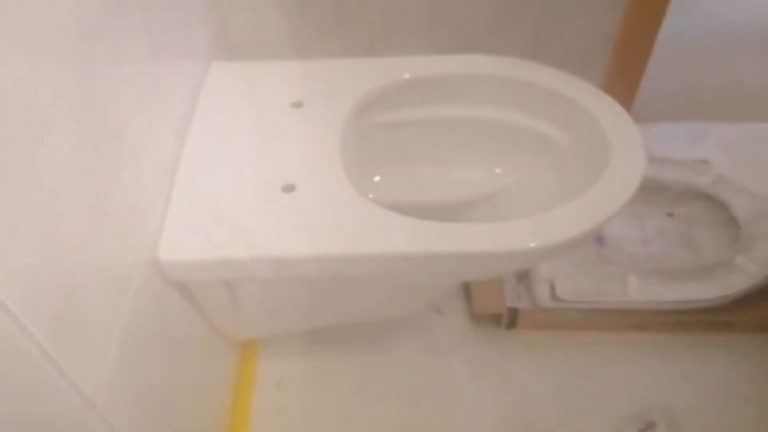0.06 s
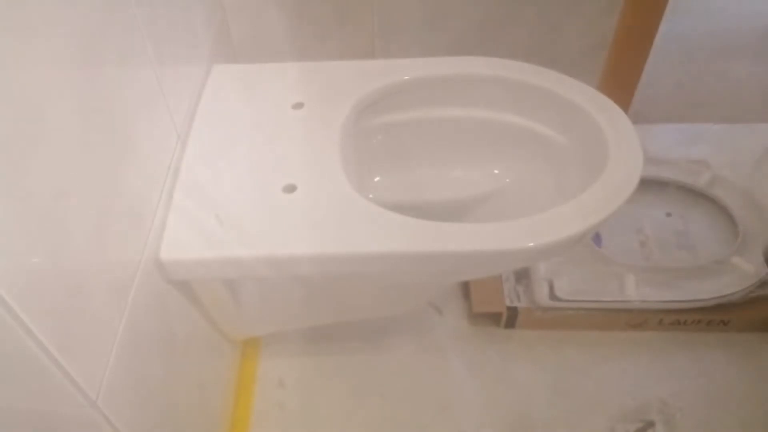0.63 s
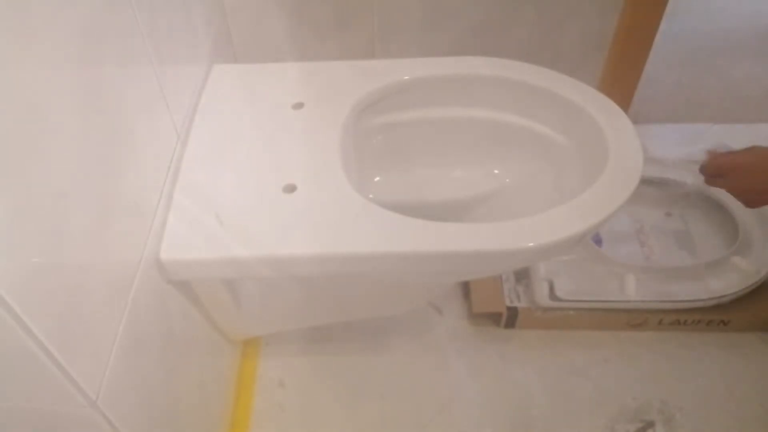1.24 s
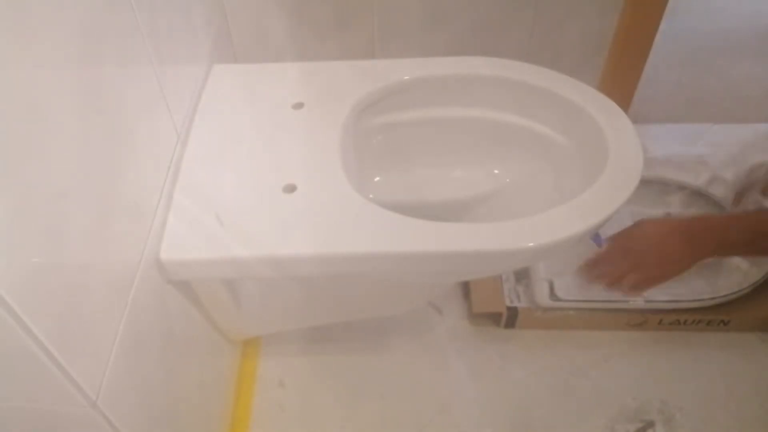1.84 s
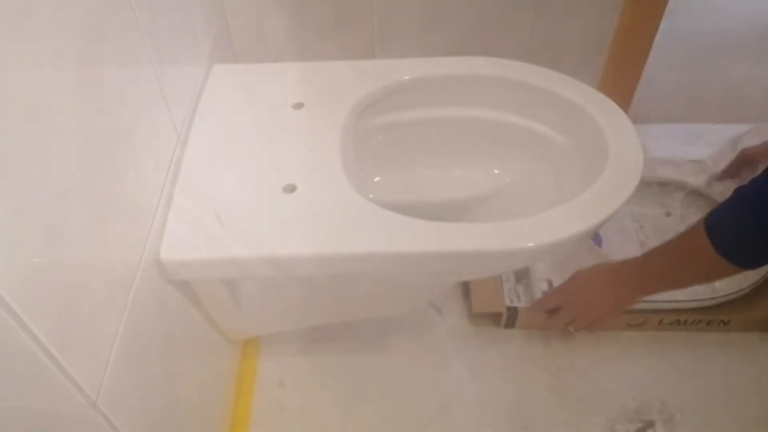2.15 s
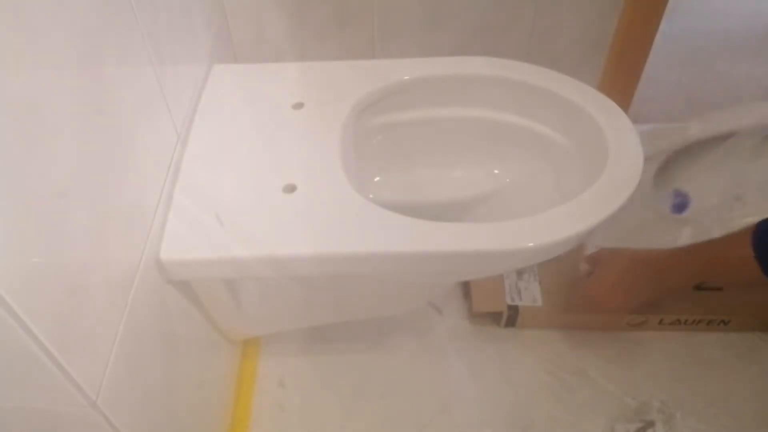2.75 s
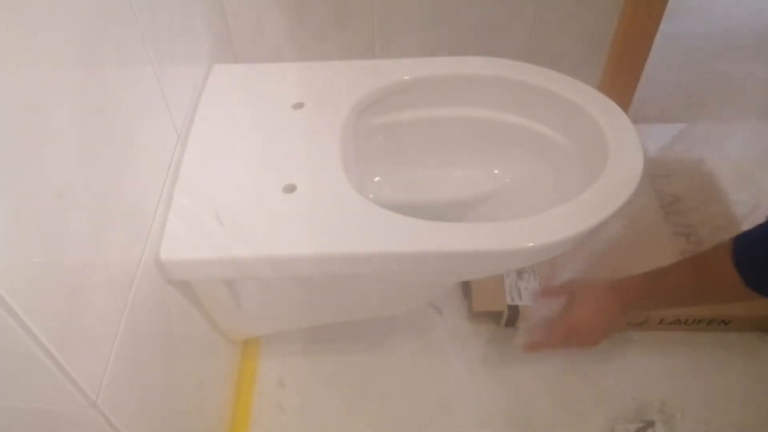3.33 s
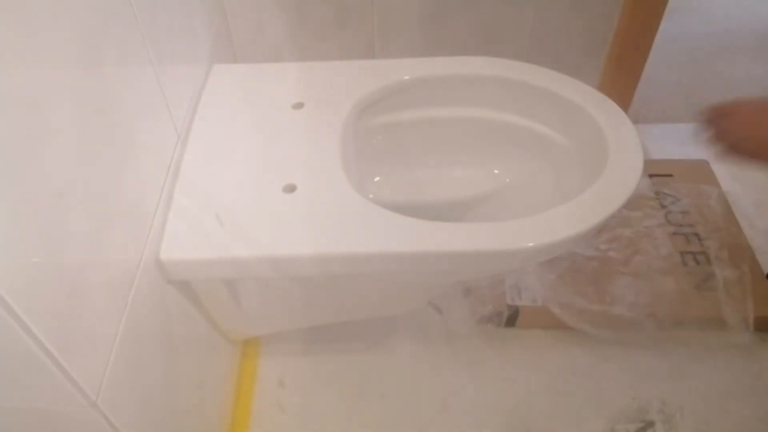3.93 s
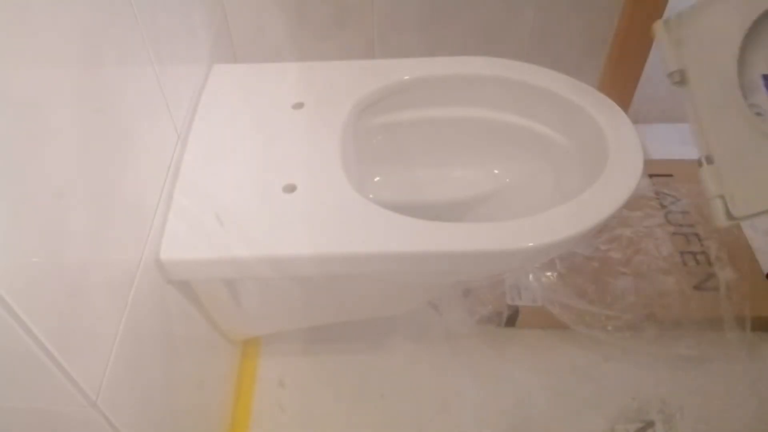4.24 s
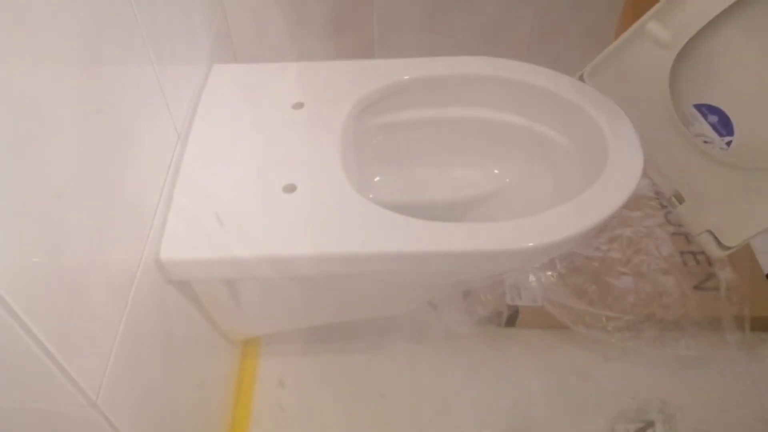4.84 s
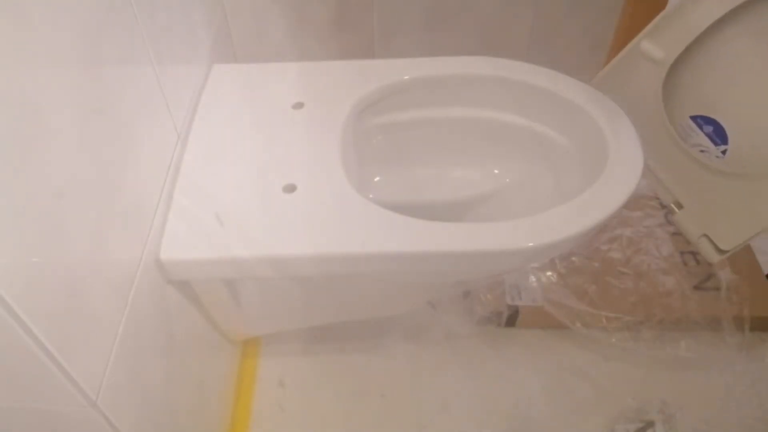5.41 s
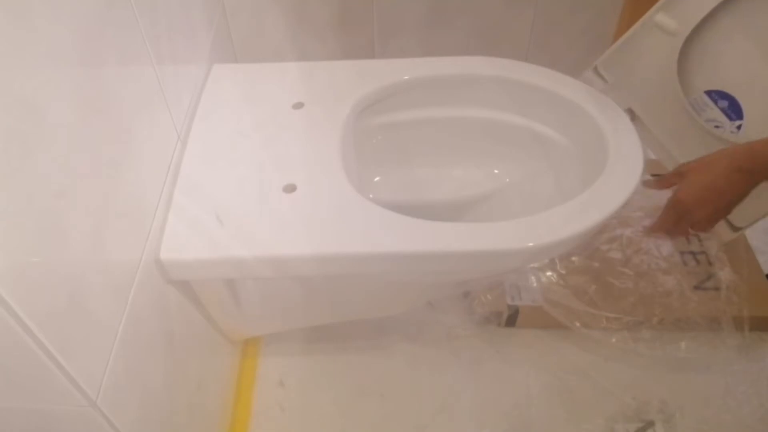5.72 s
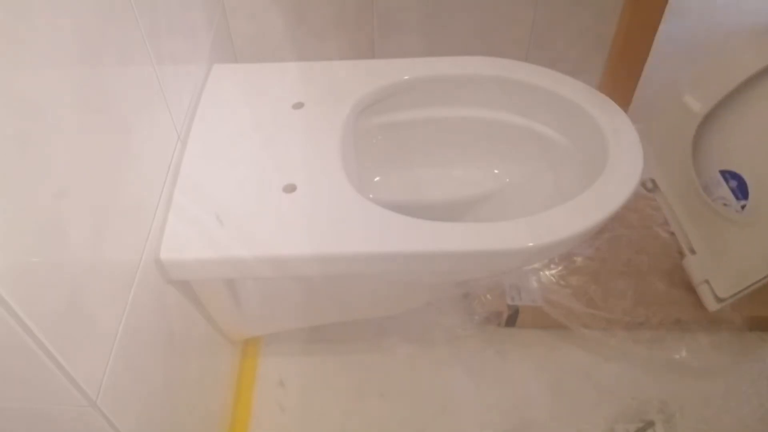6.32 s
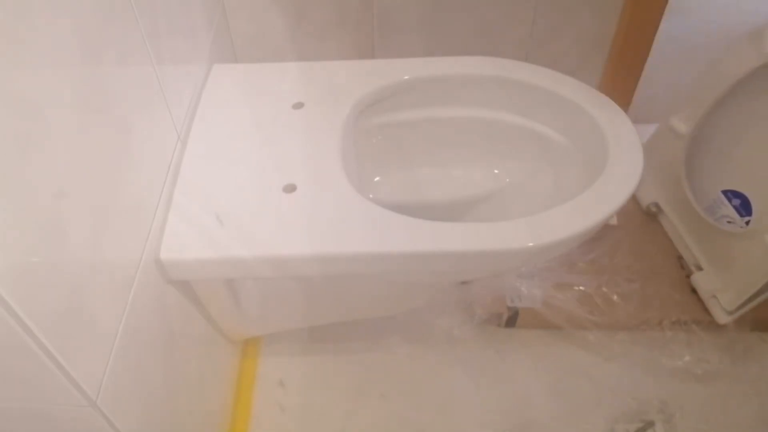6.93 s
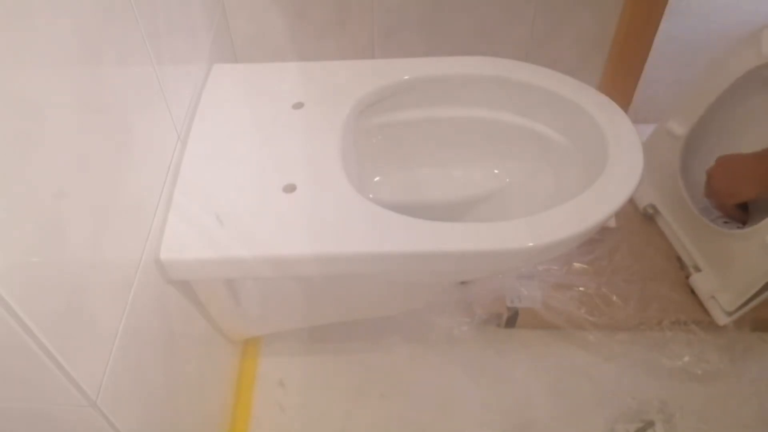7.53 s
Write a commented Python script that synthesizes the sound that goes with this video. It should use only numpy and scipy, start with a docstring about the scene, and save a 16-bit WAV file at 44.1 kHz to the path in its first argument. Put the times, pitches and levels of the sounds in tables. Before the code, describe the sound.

A toilet seat is pulled from a crinkling plastic bag, with dull cardboard thuds, hard knocks and a juddering scrape in an echoing room.

```python
"""In a small tiled bathroom, a toilet seat is drawn out of its plastic bag on a flat cardboard box.
The film slides and buckles in swells while friction shakes the box panels into a rumble. The seat
bumps the bowl and rings, is set down, judders over the floor by stick-slip and clacks once at a hinge.
Soft blows thud on the box, heavy pushes excite the room's low modes, and the tiles reverberate."""
import sys
import numpy as np
from scipy import signal
from scipy.fft import rfft, irfft, next_fast_len
from scipy.io import wavfile

SR = 44100
rng = np.random.default_rng(int(sys.argv[2]) if len(sys.argv) > 2 else 0)


def transcribe(u):
    """Save the signal u as a 16-bit wav file named by the first command-line argument.

    u: samples, shape (n,) or (channels, n), limited to [-1, 1]; the rate is SR.
    q: integer samples, one column per channel.
    """
    v = np.clip(np.atleast_2d(u).T, -1, 1)
    q = np.round(v * 32767).astype(np.int16)
    wavfile.write(sys.argv[1], SR, q)


N = 333837
TIME = np.arange(N) / SR
SPOTS = 4   # places that the handled things sound from
FFT_SIZE = next_fast_len(N + 2 * SR)


def film(rooms, slide_gain, crinkle_gain):
    """Friction and buckling: the film slides with a fine grain while its creases snap through."""
    # Each row: frequency in Hz, relative spectral level in dB.
    slide_spectrum = [(380, -20.5), (650, -4.5), (1200, 0), (1400, -2.5), (2000, -3), (2800, -7.5),
                      (3900, -17.5), (6000, -75)]
    crinkle_spectrum = [(1590, -8), (2700, -2.5), (4120, -3.5), (5100, -3), (6340, -5), (7610, -3.5),
                        (8370, -8.5), (9340, -4.5), (14500, -21), (15500, -23)]
    # Single creases snap. Each row: start in seconds, relative level in dB.
    creases = [(1.968, -15), (4.016, -28.5), (4.11, -36), (4.405, -25.5), (4.523, -24), (5.708, -32),
               (5.8645, -19.5), (5.877, -15.5), (7.099, -36), (7.263, -33.5)]
    sliding = from_db(0.5) * slide_gain * grains(per_s=4000, spread_db=0, clump_db=2.2, clump_rate=70)
    buckling = from_db(2) * crinkle_gain * grains(per_s=1700, spread_db=3, clump_db=0.64, clump_rate=98)
    buckling += contacts(creases, chatter=3.4, chatter_s=0.0063)
    return (in_room(scatter(sliding), colour(slide_spectrum), rooms, direct_db=-7.5, pan_db=2.5)
            + in_room(scatter(buckling), colour(crinkle_spectrum), rooms, direct_db=-8.5, pan_db=2.5))


def pulling():
    """Incoherent addition: pulls on the bag sum in power to gains of crinkling, sliding and rubbing."""
    # Each row: start, rise and length in seconds, relative crinkling level in dB,
    # then offsets from it in dB for sliding and for rubbing on the box.
    pulls = [(0.0, 0.0017, 0.014, -57.5, -0.5, 3.5), (0.062, 0.072, 0.31, -48, -6, -4),
             (0.212, 0.028, 0.077, -41, -5, -2), (0.317, 0.051, 0.088, -34, 0, -1),
             (0.403, 0.023, .11, -39.5, -1, 1.5), (0.669, 0.09, 0.18, -49.5, -0.5, -3.5),
             (0.796, 0.058, 0.16, -39.5, 3.5, 3), (1.012, 0.026, 0.15, -42, -0.5, -1.5),
             (1.167, 0.061, 0.068, -34, -1, 0), (1.403, 0.074, 0.26, -54.5, 0, 0),
             (1.508, 0.051, 0.13, -42.5, -1, -1.5), (1.71, .04, 0.26, -51.5, -3, -3),
             (1.943, .03, 0.077, -51, 1.5, 5), (2.05, 0.022, 0.2, -57.5, 2, 5),
             (2.236, 0.032, .1, -51.5, 1, 10), (2.297, 0.074, 0.24, -42.5, -3.5, -2.5),
             (2.544, 0.082, 0.076, -45, 2.5, 1), (2.703, 0.044, 0.27, -53.5, -1.5, -6),
             (2.84, 0.081, 0.25, -38.5, 0, 2), (3.039, 0.064, 0.14, -37.5, -.5, -.5),
             (3.222, 0.019, 0.078, -48, -16.5, -6.5), (3.409, 0.1, 0.24, -40.5, -2.5, -5),
             (3.65, .04, 0.13, -53, -1.5, -1), (3.85, 0.043, 0.14, -63.5, -2, -3),
             (4.197, 0.054, 0.62, -62, 2.5, -14), (4.484, 0.07, 0.38, -56.5, 1.5, -3),
             (4.88, 0.11, 0.15, -59.5, 10, 2), (5.692, 0.016, .04, -77, -5, -6),
             (5.838, 0.023, 0.078, -57, 0.5, -4), (5.94, .02, 0.041, -67, 6, 4),
             (6.128, 0.026, .05, -62.5, 5, 8), (6.321, 0.16, 0.23, -48, 1, -3),
             (6.658, 0.03, 0.075, -62, -3, -2), (6.805, 0.039, 0.1, -62, 2.5, 7),
             (7.258, 0.095, .11, -63, -7, -6), (7.371, 0.011, 0.013, -54.5, 6, -7)]
    power = np.zeros((3, N))
    for start, rise_s, length_s, db, slide_db, rub_db in pulls:
        levels = from_db([[db], [db + slide_db], [db + rub_db]])
        power += (levels * swell(start, rise_s, length_s, release_db_per_s=158)) ** 2
    return np.sqrt(power)


def box(rooms, rub_gain):
    """Forced vibration: friction shakes the cardboard panels and rubs on their faces."""
    # The load leans on the box. Each row: start and length in seconds, relative level in dB.
    shoves = [(0.242, .06, -38), (0.354, 0.14, -38.5), (0.804, 0.091, -38.5), (1.0, 0.089, -51.5),
              (1.16, 0.13, -43.5), (1.39, 0.055, -64), (1.52, 0.093, -48), (1.76, 0.048, -53),
              (1.94, 0.11, -44.5), (2.02, 0.12, -39.5), (2.195, 0.1, -42), (2.522, 0.12, -41),
              (2.86, .13, -44.5), (3.084, 0.15, -46), (3.333, 0.027, -50.5), (3.45, .05, -51),
              (3.616, 0.16, -54.5), (3.84, 0.074, -65), (5.17, .06, -53.5), (5.345, 0.072, -53),
              (5.97, 0.089, -59), (6.14, 0.11, -51)]
    # Each row: frequency in Hz, relative spectral level in dB.
    rumble_spectrum = [(45, -5), (65, -10), (90, -13), (125, 0), (185, -2.5), (250, -2.5), (320, -16),
                       (530, -55)]
    rub_spectrum = [(130, -24.5), (220, -1.5), (280, -3.5), (370, -2), (450, -1.5), (570, 0), (700, -4.5),
                    (900, -8), (1580, -57.5)]
    # Each row: resonance frequency and bandwidth in Hz, relative level in dB.
    panel_peaks = [(127, 19, 0), (190, 25, 6), (240.5, 20, -3.5)]
    power = sum((from_db(db) * swell(start, 0.021, length_s, release_db_per_s=215)) ** 2
                for start, length_s, db in shoves)
    shaking = from_db(-3) * np.sqrt(power) * grains(per_s=990, spread_db=3.5, clump_db=2, clump_rate=61)
    rubbing = from_db(-2.5) * rub_gain * grains(per_s=1500, spread_db=-1.5, clump_db=3.5, clump_rate=51)
    panels = hard_body(rumble_spectrum, panel_peaks, ring_db=-4)
    return (in_room(scatter(shaking), panels, rooms, direct_db=-1, pan_db=-1.4)
            + in_room(scatter(rubbing), colour(rub_spectrum), rooms, direct_db=-3, pan_db=0.5))


def thuds(rooms):
    """Contact time limits bandwidth: the softer a blow on the box, the duller its thud."""
    # Each row: start in seconds, relative level in dB, cut-off of the contact in Hz.
    blows = [(1.2, -11, 159), (2.056, -4.5, 159), (2.105, -19, 180), (2.238, -15, 300), (2.872, -9.5, 258),
             (4.797, -12.5, 223), (4.85, -27, 220), (5.854, -23, 600), (5.959, -20, 905),
             (6.145, -20.5, 450), (6.484, -10.5, 1190), (6.505, -13.5, 900), (6.70, -12, 450),
             (6.745, -21.5, 453), (6.86, -24, 1200), (7.15, -26, 480), (7.384, -7, 1190), (7.39, -5, 180),
             (7.445, -14.5, 830)]
    # Each row: frequency in Hz, relative spectral level in dB.
    panel_spectrum = [(55, -49), (75, -6), (115, 0.5), (164, 4.5), (322, -4), (427, 1), (549, -2),
                      (800, -11), (1200, -30), (3000, -30), (6000, -39)]
    forces, panel = np.zeros((SPOTS, N)), colour(panel_spectrum)
    for k, (start, db, cut_hz) in enumerate(blows):
        pulse = soften(signal.unit_impulse(SR // 20), cut_hz)
        pulse /= np.linalg.norm(through(pulse, panel))
        forces[k % SPOTS, round(start * SR):][:len(pulse)] += from_db(db) * pulse
    return in_room(forces, panel, rooms, direct_db=-9.5, pan_db=1.9)


def seat(rooms):
    """Impact excitation: the seat rings in its low modes when bumped; its edge cracks on the floor."""
    # Each row: start in seconds, relative level in dB.
    floor_hits = [(4.675, -16), (4.722, 0), (4.732, -6), (4.749, -0.5), (4.773, -4.5), (4.80, -8),
                  (4.835, -14.5)]
    bowl_hits = [(4.217, -41.5), (4.229, -47), (4.341, -51), (4.55, -60), (4.724, -48), (4.83, -42)]
    # Each row: frequency in Hz, relative spectral level in dB.
    knock_spectrum = [(200, -14), (290, -15), (450, -2), (675, -8.5), (900, 0.5), (1320, -4.5), (1490, 0.5),
                      (1650, -9), (2600, -8.5), (5000, -17), (9500, -26.5), (14000, -46)]
    # Each row: frequency in Hz, relative level in dB, 60 dB decay time in seconds.
    seat_modes = [(151, -4.5, 0.31), (196.7, 1, 0.2), (303.4, 2.5, 0.45), (378, -6, 0.2), (451, 3, 0.081),
                  (544, -9, 0.22), (600, -1.5, 0.17)]
    knocks = scatter(contacts(floor_hits, chatter=1, chatter_s=0.0053))
    bumps = scatter(contacts(bowl_hits, chatter=0.22, chatter_s=0.008))
    shell = soften(soften(ringing(seat_modes, count=SR), cut_hz=1100), cut_hz=690)
    return (in_room(knocks, colour(knock_spectrum), rooms, direct_db=-10, pan_db=2.6)
            + in_room(bumps, shell, rooms, direct_db=-4.5, pan_db=2))


def judder(rooms):
    """Stick-slip friction: the seat breaks loose on the tiles, then scrapes in a second stroke."""
    # Each row: time in seconds, relative level in dB, slips per second.
    first_stroke = [(5.07, -41, 126), (5.083, -27.5, 117), (5.125, -25.5, 129), (5.165, -25.5, 132),
                    (5.21, -29.5, 160), (5.27, -38, 195)]
    second_stroke = [(5.255, -24.5, 169.8), (5.28, -20.5, 170.7), (5.298, -17.5, 159.6),
                     (5.315, -35, 119.7), (5.34, -39, 89.9), (5.47, -45, 70), (5.5, -70, 60.4)]
    # Each row: start in seconds, relative level in dB.
    sharp_slips = [(5.0594, -5), (5.073, 1), (5.0823, 3.5), (5.1235, 2), (5.1887, -23)]
    # Each row: frequency in Hz, relative spectral level in dB.
    first_spectrum = [(150, -22.5), (400, -18), (600, -8.5), (800, -6), (1250, 1.5), (1900, -9),
                      (2600, -3.5), (3500, -10), (4300, -9.5), (5800, -9.5), (8400, -10.5), (9800, -9.5),
                      (12000, -21), (15500, -29)]
    second_spectrum = [(130, -19), (400, -23.5), (700, -19), (1050, -1), (1450, -2.5), (2100, 1),
                       (2850, -2), (3400, -7), (5700, -8), (8400, -13), (9800, -9.5), (12000, -19),
                       (15500, -28)]
    # Each row: resonance frequency and bandwidth in Hz, relative level in dB.
    first_peaks = [(1003, 27, 4), (1250, 27, 7), (2410, 36, 0), (4050, 51, 2), (5650, 220, -5.5),
                   (7180, 93, -7), (10100, 150, -20)]
    second_peaks = [(1315, 320, 4), (1539, 27, 14.5), (1870, 74, -4), (2205, 47, 3), (2530, 28, -13),
                    (3140, 160, -17), (3730, 110, -6), (6100, 110, -7)]
    first = scatter(stick_slip(first_stroke) + contacts(sharp_slips, chatter=0.59, chatter_s=0.0041))
    second = scatter(stick_slip(second_stroke))
    first_body = hard_body(first_spectrum, first_peaks, ring_db=-7.5)
    second_body = hard_body(second_spectrum, second_peaks, ring_db=-3)
    return (in_room(first, first_body, rooms, direct_db=-10.5, pan_db=1.5)
            + in_room(second, second_body, rooms, direct_db=-11.5, pan_db=2.5))


def stick_slip(stroke):
    """Relaxation oscillation: an edge sticks and slips at an uneven rate, with grit in between."""
    times, level_db, per_s = np.transpose(stroke)
    cycles = np.cumsum(np.interp(TIME, times, per_s) * from_db(3 * drift(150))) / SR
    released = np.diff(np.floor(cycles), prepend=0) > 0
    slips = rms_one(released * from_db(1.8 * rng.standard_normal(N)))
    grit = grains(per_s=3000, spread_db=3, clump_db=3.5, clump_rate=140)
    moving = (TIME >= times[0]) & (TIME <= times[-1])
    return from_db(np.interp(TIME, times, level_db)) * moving * (0.54 * slips + 0.48 * grit)


def hinges(rooms):
    """Damped resonance: the plastic creaks in short ticks and rings as a hinge hits its stop."""
    # Each row: start in seconds, relative level in dB, pitch in Hz.
    ticks = [(3.224, -8.5, 2460), (3.255, -16.5, 2580), (4.014, -33, 2740), (4.32, -23.5, 1590),
             (4.404, -32, 5740), (4.616, -17, 2350), (4.619, -24, 3180)]
    # Each row: start in seconds, relative level in dB.
    stop_hits = [(6.1905, 5.5), (6.196, -8)]
    # Each row: frequency in Hz, relative spectral level in dB.
    clack_spectrum = [(240, -19), (420, -14.5), (620, -8), (800, -6.5), (1050, -13), (1770, -2), (2100, -7),
                      (2400, -2), (2750, -3), (3900, -14), (4550, -6.5), (5100, -12.5), (6400, -6),
                      (7950, -16.5), (12800, -26.5), (15000, -57)]
    # Each row: resonance frequency and bandwidth in Hz, relative level in dB.
    hinge_peaks = [(1045, 26, 3), (1283, 63, 0.5), (1760, 30, -6), (2383, 25, 8.5), (2580, 39, 2),
                   (2660, 27, -3), (4450, 58, -5.5), (4617, 30, -9), (5620, 25, -4), (6350, 28, -9),
                   (6680, 35, -6)]
    creaks = 0
    for start, db, hz in ticks:
        tick = from_db(db) * energy_one(ringing([(hz, 0, 0.007)], count=SR // 20))
        creaks += through(contacts([(start, 0)], chatter=1.4, chatter_s=0.0025), tick)
    clack = scatter(contacts(stop_hits, chatter=0.98, chatter_s=0.003))
    hinge = hard_body(clack_spectrum, hinge_peaks, ring_db=0)
    return (in_room(creaks, [1], rooms[:1], direct_db=-11, pan_db=3.5)
            + in_room(clack, hinge, rooms, direct_db=-27, pan_db=3.5))


def room_boom():
    """Standing waves: heavy, soft pushes set the room's low modes booming."""
    # Each row: start in seconds, relative level in dB.
    pushes = [(0.44, -42.5), (0.86, -45.5), (2.36, -46), (2.62, -65), (5.35, -51), (6.791, -37.5)]
    # Each row: frequency in Hz, relative level in dB, 60 dB decay time in seconds.
    room_modes = [(64.8, -5.5, 1.5), (51, -11, .3), (96.4, -11.5, 1.4), (134.4, -14, 0.65)]
    force = soften(contacts(pushes, chatter=0.1, chatter_s=0.002), cut_hz=200)
    return through(force, ringing(room_modes, count=2 * SR))


def bathroom():
    """Diffuse reverberation: echoes off the tiles die band by band, alike in both ears in the bass."""
    # Each row: frequency in Hz, reverberation time in seconds.
    room_t60 = [(80, 0.7), (250, 0.93), (1000, 0.66), (3000, 0.7), (7000, 0.55), (14000, 0.41)]
    # Each row: frequency in Hz, left-right correlation.
    correlation = [(30, 1), (60, 0.88), (170, 1), (260, 1), (350, 1), (550, 0.81), (1000, -0.28),
                   (2000, -0.1), (4000, -0.077), (12000, -0.22)]
    t, hz = TIME[:SR], np.arange(SR // 2 + 1)
    mid, side = np.exp(2j * np.pi * rng.random((2, len(hz))))
    alike = at_hz(correlation, hz)
    field = np.sqrt(1 + alike) * mid + np.sqrt(1 - alike) * side * [[1], [-1]]
    early = (1 + 0.65 * np.exp(-t / 0.029)) * (t > 0.0015)   # near walls answer first and loudest
    centres = np.geomspace(60, 15360, 9)
    echoes = 0
    for centre, weights in zip(centres, np.eye(len(centres))):
        band = irfft(field * at_hz(list(zip(centres, weights)), hz), SR)
        echoes += band * energy_one(early * from_db(-60 * t / at_hz(room_t60, centre)))
    return energy_one(echoes)


def still_air(rooms):
    """Ambient noise: a faint, steady random pressure, strongest in the bass."""
    # Each row: frequency in Hz, relative spectral level in dB.
    air_spectrum = [(25, -10), (45, -14), (65, -2), (100, -20), (200, -9), (300, -16), (500, -19.5),
                    (1100, -25.5), (2500, -27.5), (4000, -31.5), (10000, -37.5), (15000, -52)]
    noise = from_db(-65) * rng.standard_normal(N)
    return in_room(scatter(noise), colour(air_spectrum), rooms, direct_db=-5, pan_db=3.5)


def swell(start, rise_s, length_s, release_db_per_s, sag_db_per_s=16.5):
    """Attack and decay: the gain of a hand movement rises, slackens, and dies away once let go."""
    t = np.maximum(TIME - start, 0)
    rise = np.sin(np.pi / 2 * np.minimum(t / rise_s, 1)) ** 2
    return rise * from_db(-sag_db_per_s * t - release_db_per_s * np.maximum(t - length_s, 0))


def grains(per_s, spread_db, clump_db, clump_rate):
    """Shot noise: tiny random clicks whose strength comes in clumps; rms 1."""
    born = rng.random(N) < per_s / SR
    sizes = from_db(spread_db * np.minimum(rng.exponential(1, N), 4))
    signs = rng.choice([-1, 1], N)
    return rms_one(born * sizes * signs * from_db(clump_db * drift(clump_rate)))


def drift(rate):
    """Random modulation: a line through `rate` random values a second; rms 1."""
    knots = rng.standard_normal(4000)
    return rms_one(np.interp(TIME * rate, np.arange(len(knots)), knots))


def contacts(blows, chatter, chatter_s):
    """Contact chatter: each blow is an impulse and a dying burst of smaller contacts."""
    force, t = np.zeros(N + SR), TIME[:SR // 10]
    for start, db in blows:
        burst = chatter * energy_one(rng.standard_normal(len(t)) * np.exp(-t / chatter_s))
        burst[0] = 1
        force[round(start * SR):][:len(t)] += from_db(db) * energy_one(burst)
    return force[:N]


def soften(x, cut_hz):
    """Compliance: a soft contact acts as a low-pass filter."""
    return signal.sosfilt(signal.butter(2, cut_hz, fs=SR, output="sos"), x)


def hard_body(spectrum, peaks, ring_db):
    """Impulse response: a broad crack, then resonances that ring longer the narrower they are."""
    crack = colour(spectrum)
    modes = [(hz, db + 20 * np.log10(width), np.log(1000) / np.pi / width) for hz, width, db in peaks]
    return energy_one(crack + from_db(ring_db) * energy_one(ringing(modes, count=len(crack))))


def ringing(modes, count):
    """Modal superposition: damped cosines of alternating sign, count samples long."""
    t = TIME[:count]
    return sum((-1) ** k * from_db(db - 60 * t / t60) * np.cos(2 * np.pi * hz * t)
               for k, (hz, db, t60) in enumerate(modes))


def colour(spectrum, size=8192):
    """Minimum-phase response of a spectrum, falling away below its first point; energy 1."""
    hz = np.arange(size // 2 + 1) * SR / size
    bass_loss = np.clip(hz / spectrum[0][0], 0.01, 1) ** 2
    cepstrum = irfft(np.log(from_db(at_hz(spectrum, hz)) * bass_loss))
    cepstrum[size // 2:] = 0   # makes the response causal
    cepstrum[0] = 0
    return energy_one(irfft(np.exp(rfft(2 * cepstrum))))


def scatter(clicks):
    """Distributed source: each sample comes from one of several spots, chosen at random."""
    return clicks * (rng.integers(0, SPOTS, N) == np.arange(SPOTS)[:, None])


def in_room(forces, body, rooms, direct_db, pan_db):
    """Direct plus reverberant field of a body driven at several spots; positive pan leans left."""
    direct = from_db(direct_db)
    drive = rfft(forces, FFT_SIZE)
    echoes = np.einsum("sf,scf->cf", drive, rooms)   # spot, channel, frequency
    heard = (echoes + direct * drive.sum(axis=0)) / np.hypot(1, direct)
    balance = from_db([[pan_db / 2], [-pan_db / 2]])
    return irfft(heard * rfft(body, FFT_SIZE), FFT_SIZE)[:, :N] * balance


def through(x, response):
    """Convolution with an impulse response."""
    return signal.oaconvolve(np.atleast_2d(x), np.atleast_2d(response), axes=-1)[:, :N]


def at_hz(points, hz):
    """Interpolation on a log-frequency axis."""
    known_hz, values = np.transpose(points)
    return np.interp(np.log(np.maximum(hz, 1)), np.log(known_hz), values)


def from_db(db):
    """Decibels to amplitude ratio."""
    return 10 ** (np.asarray(db) / 20)


def rms_one(x):
    """Normalisation to rms 1."""
    return x / np.sqrt(np.mean(x ** 2) + 1e-20)


def energy_one(x):
    """Normalisation to mean energy 1 per channel."""
    return rms_one(x) / np.sqrt(x.shape[-1])


def scene():
    """Superposition: all sources add in one room, where each spot has its own echoes."""
    rooms = rfft(np.array([bathroom() for spot in range(SPOTS)]), FFT_SIZE)
    background = room_boom() + still_air(rooms)
    crinkle_gain, slide_gain, rub_gain = pulling()
    unwrapping = film(rooms, slide_gain, crinkle_gain) + box(rooms, rub_gain)
    return unwrapping + thuds(rooms) + seat(rooms) + judder(rooms) + hinges(rooms) + background


def record(dry):
    """Band limiting: a steep elliptic low-pass removes the highest treble."""
    cutoff_hz = 15250
    return signal.sosfilt(signal.ellip(12, 0.1, 90, cutoff_hz, fs=SR, output="sos"), dry)


dry = scene()
out = record(dry)
transcribe(out)
```